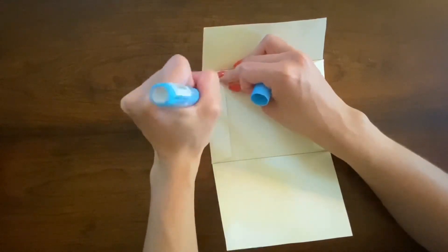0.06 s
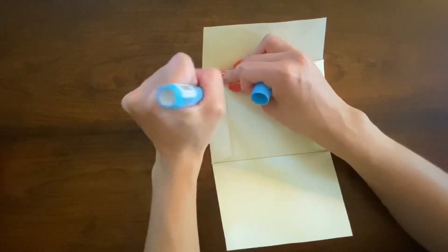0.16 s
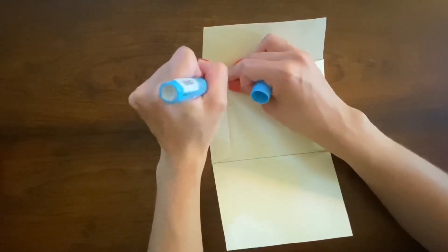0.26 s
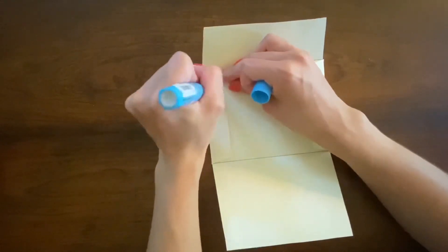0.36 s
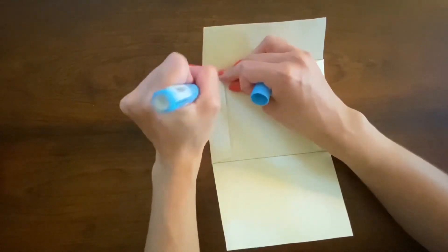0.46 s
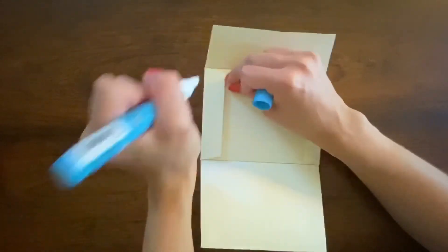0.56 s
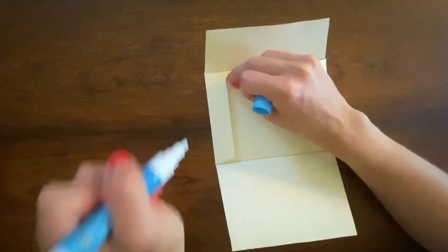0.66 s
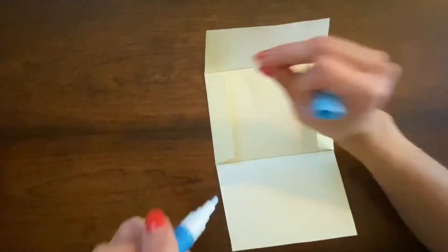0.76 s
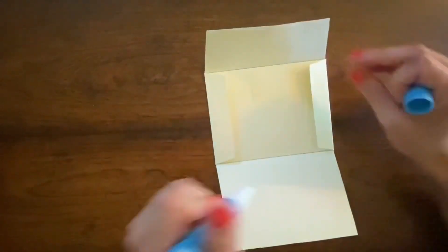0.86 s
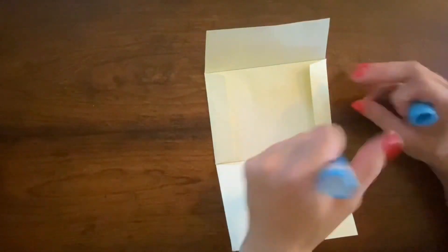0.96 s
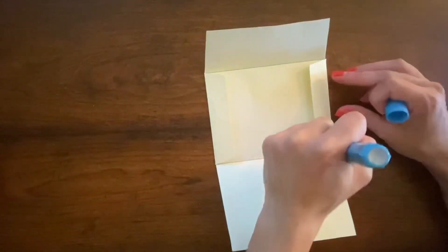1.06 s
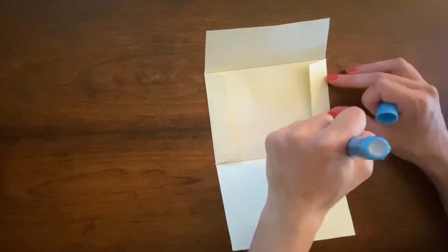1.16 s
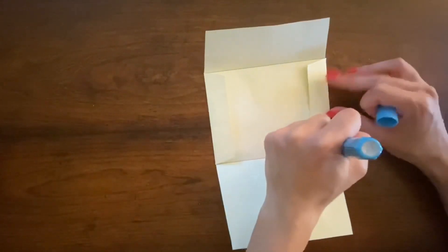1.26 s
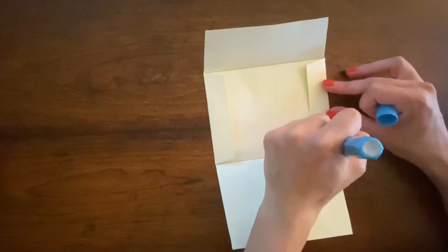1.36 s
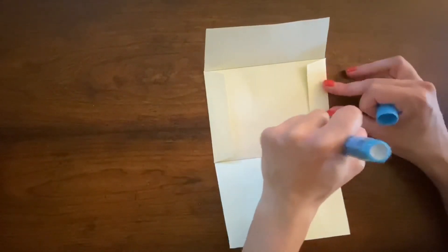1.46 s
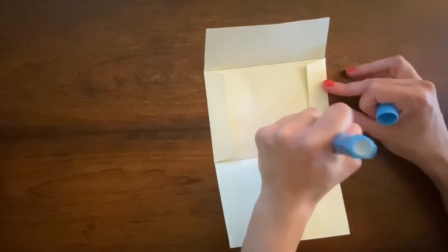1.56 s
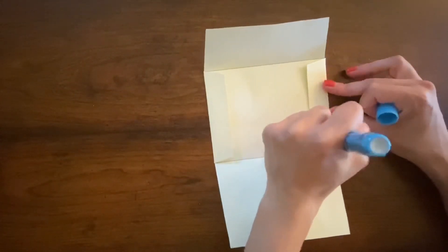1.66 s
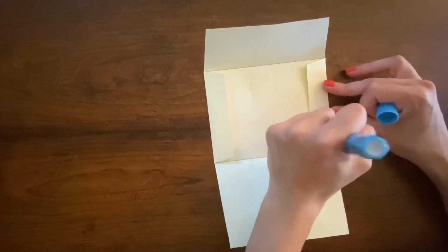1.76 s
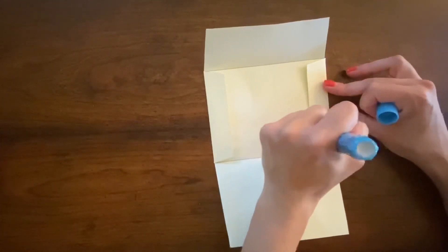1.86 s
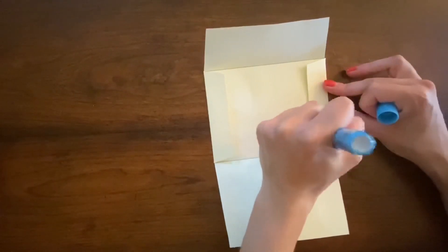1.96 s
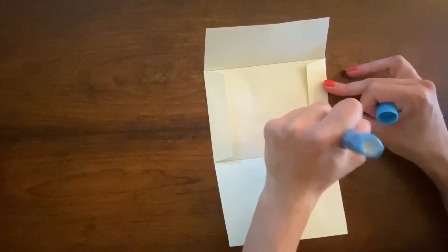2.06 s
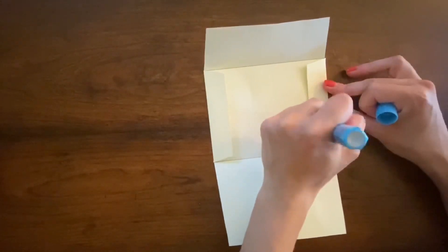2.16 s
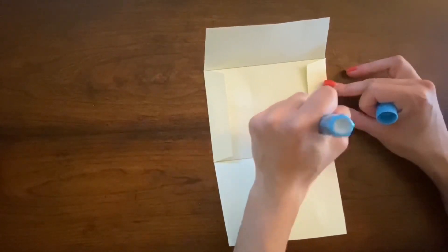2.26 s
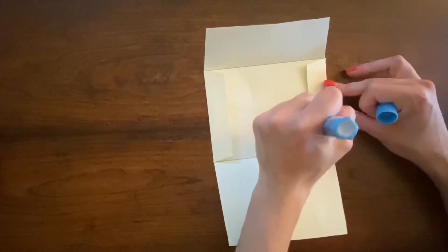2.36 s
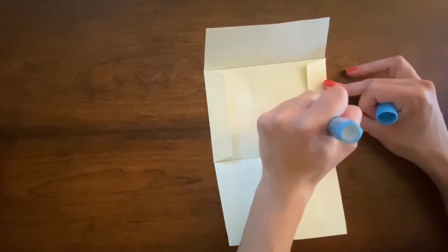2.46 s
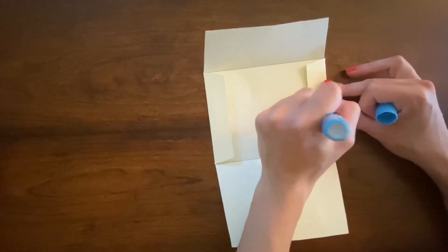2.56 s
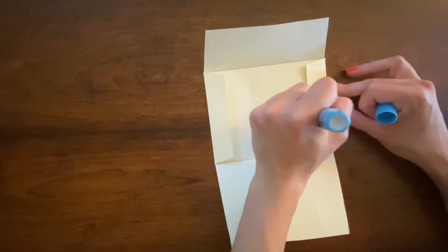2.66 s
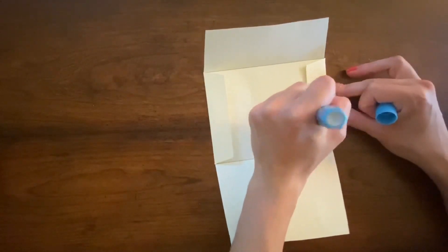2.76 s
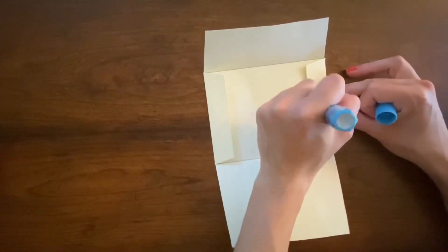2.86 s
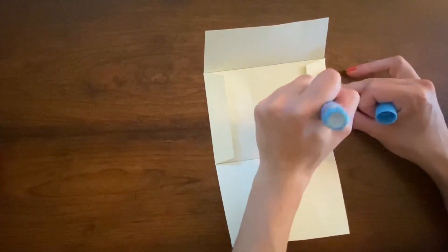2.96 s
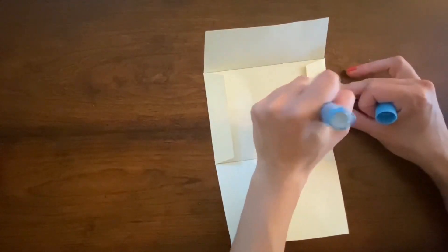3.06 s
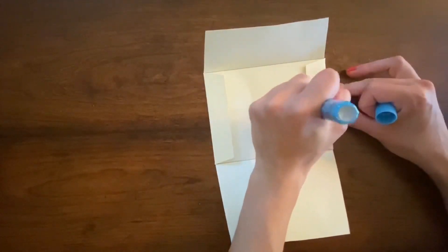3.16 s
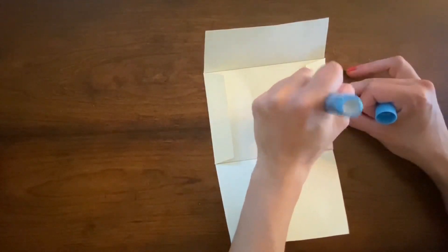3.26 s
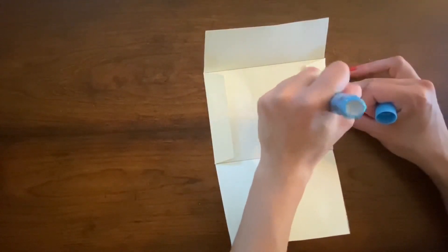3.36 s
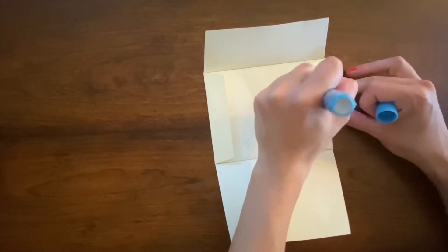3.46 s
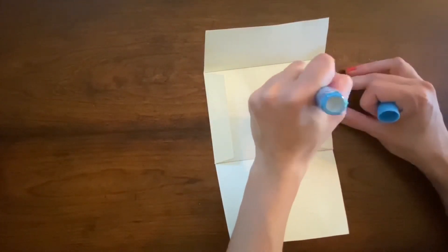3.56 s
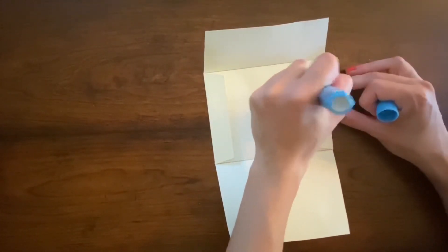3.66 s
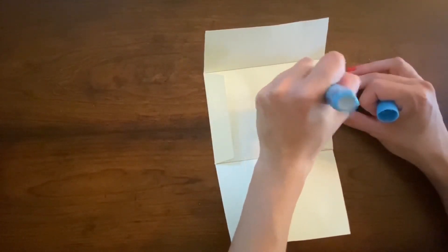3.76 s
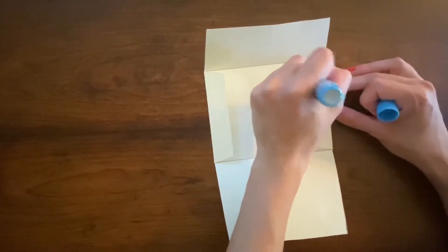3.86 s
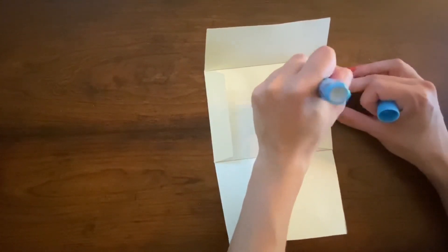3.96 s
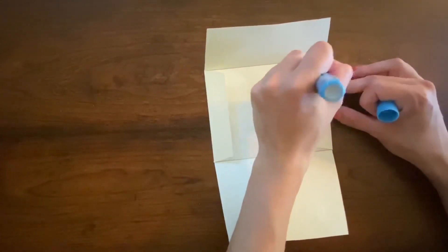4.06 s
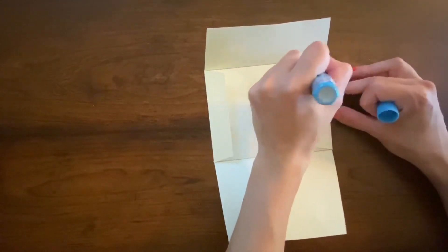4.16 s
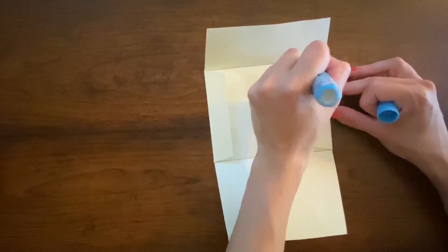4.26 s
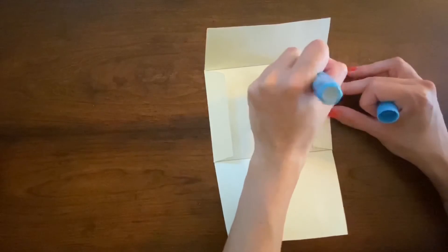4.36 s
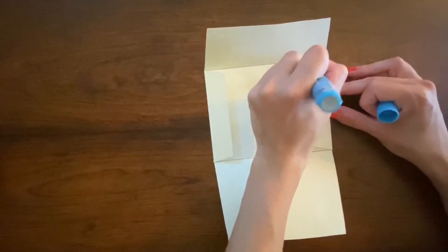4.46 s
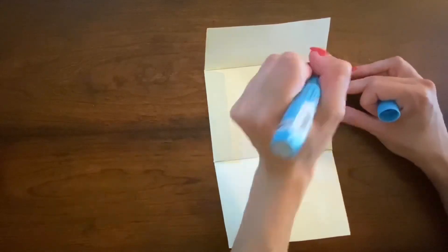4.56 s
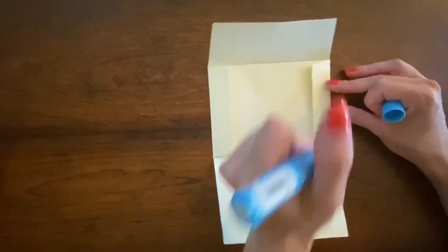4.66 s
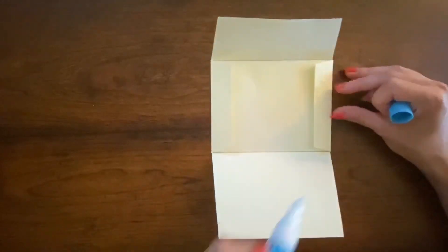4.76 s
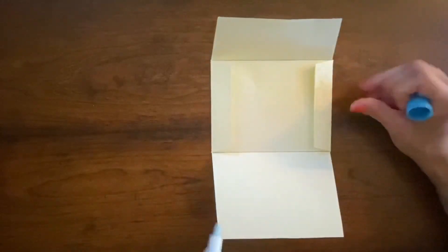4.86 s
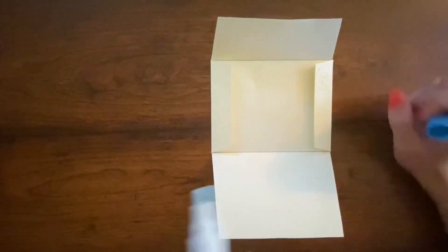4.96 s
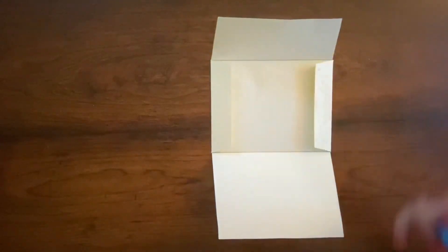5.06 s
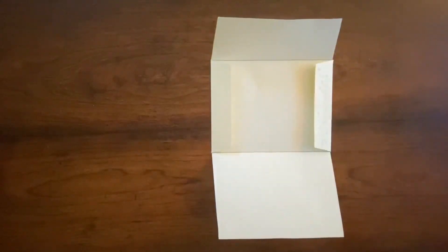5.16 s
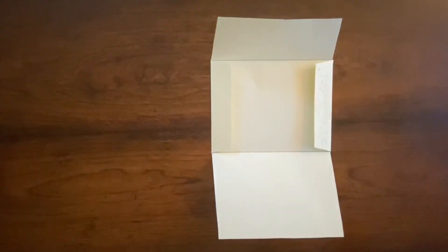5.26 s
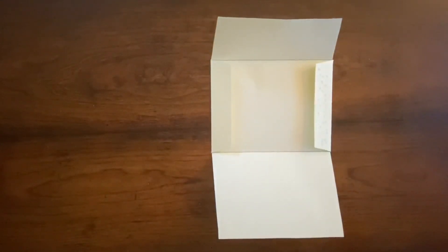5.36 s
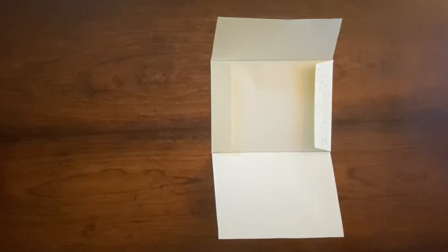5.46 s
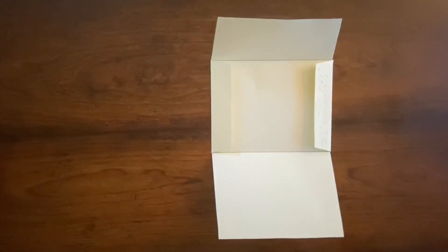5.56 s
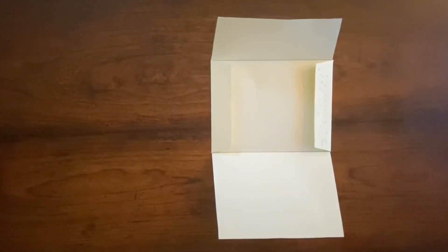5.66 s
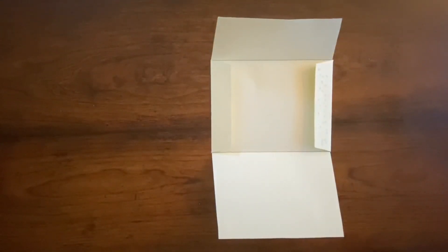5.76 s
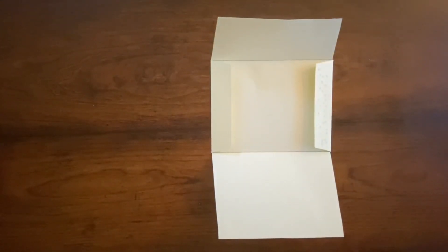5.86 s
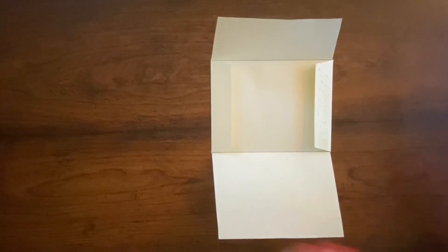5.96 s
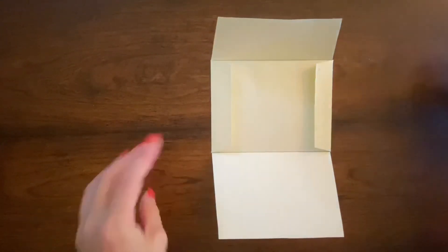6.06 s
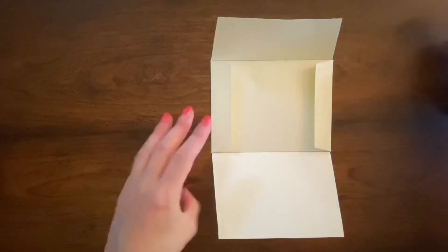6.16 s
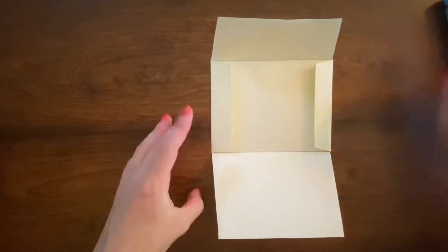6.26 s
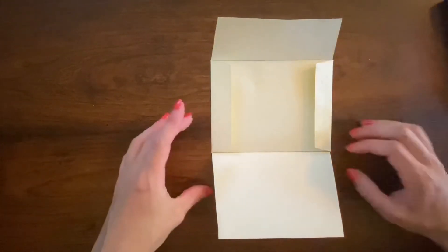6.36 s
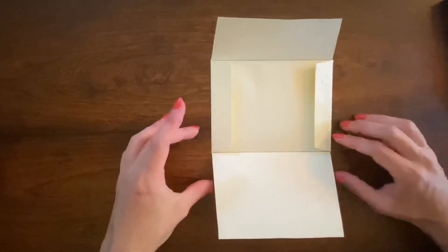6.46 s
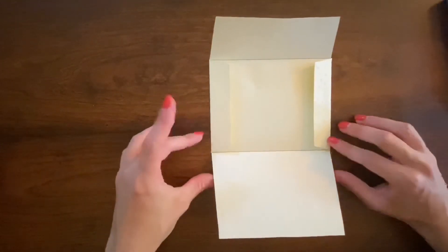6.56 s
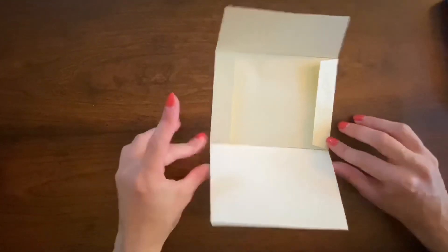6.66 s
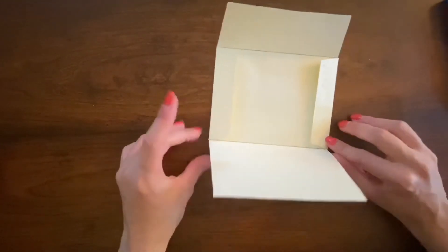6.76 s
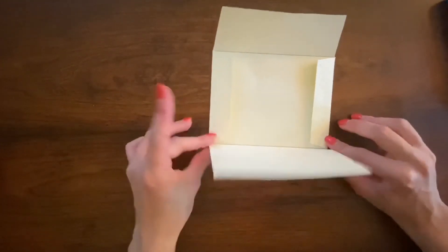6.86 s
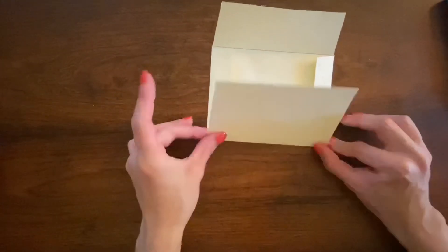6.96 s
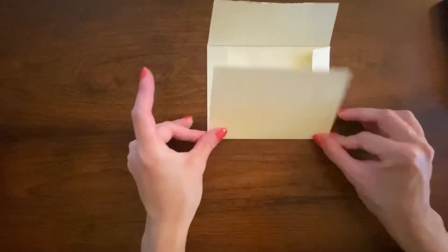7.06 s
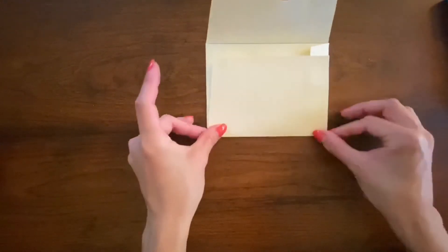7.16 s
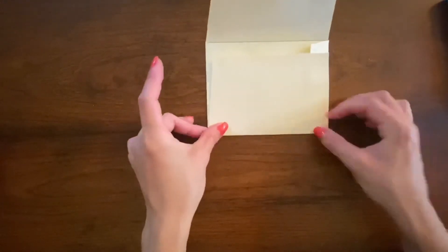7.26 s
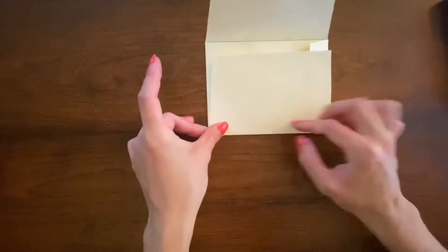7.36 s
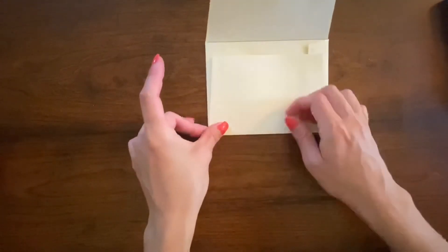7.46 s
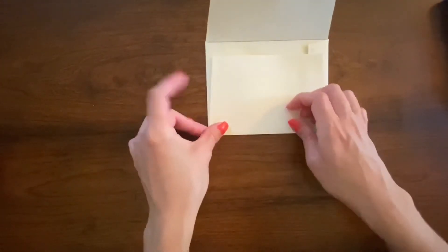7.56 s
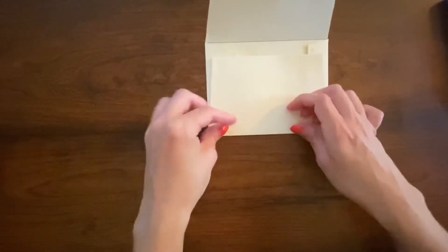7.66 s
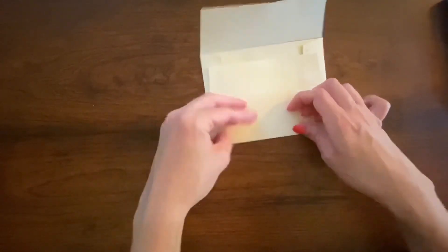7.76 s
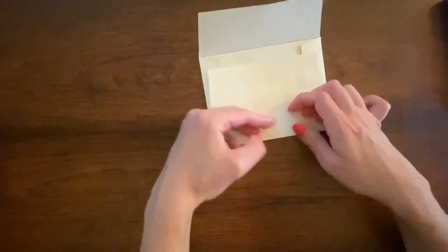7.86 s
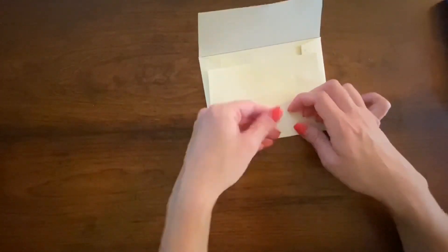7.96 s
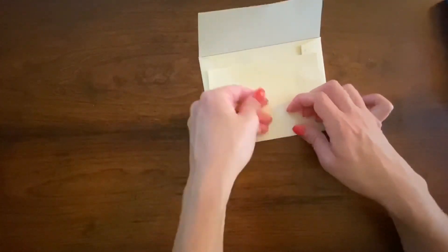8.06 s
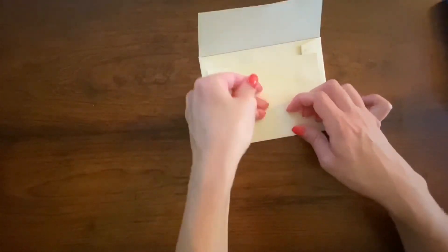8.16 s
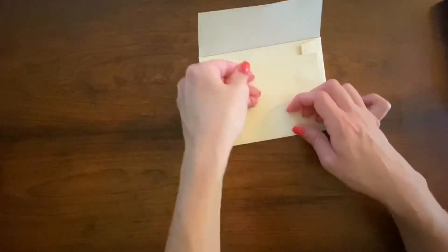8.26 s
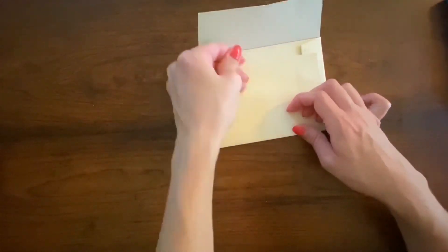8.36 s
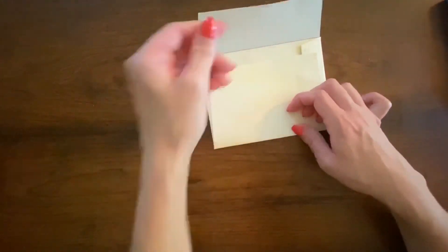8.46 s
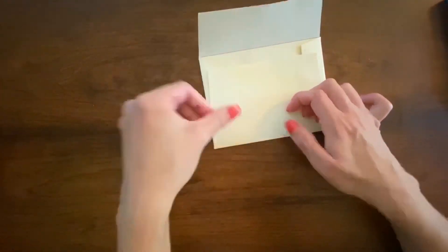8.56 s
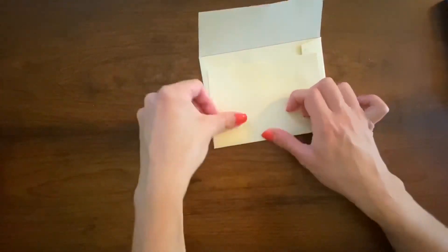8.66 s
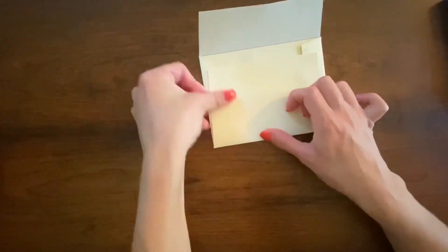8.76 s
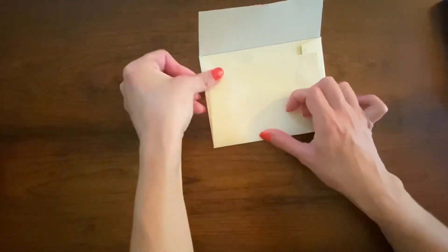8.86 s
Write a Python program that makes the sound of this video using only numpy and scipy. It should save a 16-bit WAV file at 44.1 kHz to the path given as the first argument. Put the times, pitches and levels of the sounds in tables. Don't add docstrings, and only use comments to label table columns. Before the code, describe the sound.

Close up in a quiet room, fingers shift stiff card with crisp rustles and a few table bumps. A glue pen then dabs very quickly along it, about eleven soft low thumps a second with dry scuffs. After a short lull the cap meets the barrel and snaps on, the pen clatters onto wood, and the card is folded and pressed with soft crackles.

```python
import sys
import numpy as np
from scipy import signal
from scipy.fft import rfft, irfft
from scipy.io import wavfile
from scipy.ndimage import uniform_filter1d

SR = 44100
rng = np.random.default_rng(int(sys.argv[2]) if len(sys.argv) > 2 else 0)


def unload_wav(signal):
    wavfile.write(
        sys.argv[1],
        SR,
        np.round(np.clip(np.atleast_2d(signal).T, -1, 1) * 32767).astype(np.int16),
    )


def voltage_ratio(decibels):
    exponent = np.asarray(decibels, float) / 20
    return 10 ** exponent


N = 392049
SIZE = 8192
HZ = np.fft.rfftfreq(SIZE, 1 / SR)
LONG_HZ = np.fft.rfftfreq(N, 1 / SR)

# (frequency [Hz], width [Hz], level [dB])
CARD = [(1347, 670, 12.5), (2023, 300, 6), (2650, 450, 6.5), (3650, 1570, 9.5), (5260, 1700, 17.5),
        (9050, 24000, -9.5), (14700, 2200, -35)]
# (frequency [Hz], likeness [0-1])
LIKENESS = [(60, 1), (150, 0.95), (300, 0.96), (600, 0.22), (1200, 0.49), (2200, 0.66), (3500, 0.55),
            (6000, 0.92), (15000, 0.97)]


def evened(x):
    return x / np.sqrt(np.mean(x ** 2) + 1e-20)


def read(points, hz):
    f, value = np.transpose(points)
    return np.interp(np.log(hz + 1), np.log(f + 1), value)


def modes(resonances, hz):
    return sum(voltage_ratio(db) * 1j * hz * w / (f ** 2 - hz ** 2 + 1j * hz * w) for f, w, db in resonances)


def band(hz, lo_hz, hi_hz):
    return 1 / np.sqrt((1 + (lo_hz / (hz + 1)) ** 8) * (1 + (hz / hi_hz) ** 8))


def wiggle(spread):
    once = uniform_filter1d(rng.standard_normal(len(HZ)), int(spread))
    return evened(uniform_filter1d(once, int(spread)))


def shifted(resonances, spread):
    chance = rng.standard_normal((len(resonances), 2))
    return [(f * (1 + spread * a), w, db + 50 * spread * b) for (f, w, db), (a, b) in zip(resonances, chance)]


def add(mix, s, sound):
    at = round(s * SR) - SIZE // 2
    cut = max(-at, 0)
    part = mix[at + cut:at + SIZE]
    part += sound[cut:cut + len(part)]


def peaked(spectrum, db, window=350):
    x = irfft(spectrum, SIZE)
    return voltage_ratio(db) * x / np.sqrt(uniform_filter1d(x ** 2, int(window)).max() + 1e-20)


def slips(rise_ms, fall_ms, sharp, grainy_db):
    t_ms = (np.arange(SIZE) - SIZE // 2) / SR * 1000
    shape = np.exp(-np.where(t_ms < 0, -t_ms / rise_ms, t_ms / fall_ms) ** sharp)
    grains_db = grainy_db * np.repeat(rng.standard_normal(SIZE // 32), 32)
    return rfft(shape * rng.standard_normal(SIZE) * voltage_ratio(grains_db))


def room_tone():
    # (frequency [Hz], density [dB per Hz])
    air_colour = [(150, -68), (250, -10.5), (421, -5.5), (443, -10), (827, -13.5), (871, -14), (950, -19.5),
                  (1340, -25), (15800, -52)]
    # (frequency [Hz], width [Hz], level [dB])
    hums = [(68, 39, -70.5), (807.3, 18, -77), (368, 15, -81), (225.8, 10.5, -73), (1728, 340, -87.5)]
    white = rfft(rng.standard_normal((2, N)))
    like = np.clip(read(LIKENESS, LONG_HZ) - .1, 0, 1) * band(LONG_HZ, 0, 4000)
    white[1] = like * white[0] + np.sqrt(1 - like ** 2) * white[1]
    air = white * voltage_ratio(read(air_colour, LONG_HZ)) * band(LONG_HZ, 167, 16500)
    out = voltage_ratio(-67.5) * evened(irfft(air, N))
    for f, w, db in hums:
        out += voltage_ratio(db) * evened(irfft(white * modes([(f, w, 0)], LONG_HZ) ** 2, N))
    return out


def reflections(x):
    # (frequency [Hz], time to fall 60 dB [s])
    fall_time = [(100, 0.14), (1000, 0.098), (5000, 0.17), (14000, 0.25)]
    out, turn = np.zeros((2, N)), np.arange(N) / SR * 9.0
    for k in range(3):
        hz, t, z = signal.stft(rng.standard_normal((2, SR // 2)), SR, nperseg=256)
        tail = signal.istft(z * voltage_ratio(-60 * t / read(fall_time, hz)[:, None]), SR, nperseg=256)[1]
        share = np.sqrt(2 / 3) * np.cos(np.pi * (turn + k) / 3)
        out += signal.fftconvolve(x * share, tail / np.linalg.norm(tail[0]), axes=1)[:, :N]
    return out


def hands():
    # (time [s], rustle [dB], weight of the arms [dB])
    motion = [(0.0, -76, -57), (0.49, -77, -58.5), (0.74, -81.5, -56.5), (1.34, -92, -60.5),
              (1.88, -76.5, -57.5), (4.18, -73.5, -55.5), (4.41, -83, -57), (5.54, -101, -61),
              (6.09, -70, -60), (6.359, -102, -60.5), (6.86, -71.5, -59.5), (7.52, -91, -59.5),
              (7.85, -76.5, -58), (8.89, -87.5, -59)]
    # (frequency [Hz], width [Hz], level [dB])
    legs = [(68, 12, -1.5), (98.9, 22, 0), (181, 51, -16.5)]
    s, fizz_db, rumble_db = np.transpose(motion)
    body_db = -82.5 + .5 * (fizz_db + 83.5)
    layers = [  # level, resonances, band from and to [Hz], lumpiness [dB]
        (fizz_db, CARD, 3000, 16500, 1.5),
        (body_db, CARD, 900, 3000, 1.5),
        (rumble_db, legs, 30, 250, 2.5)]
    t, out = np.arange(N) / SR, np.zeros(N)
    for db, body, lo, hi, lumpy_db in layers:
        white = rfft(rng.standard_normal(N))
        noise = evened(irfft(white * modes(body, LONG_HZ) * band(LONG_HZ, lo, hi), N))
        lumps = evened(uniform_filter1d(rng.standard_normal(N), 1500))
        out += noise * voltage_ratio(np.interp(t, s, db) + lumpy_db * lumps)
    return out


def plastic(hits, tone, rings, aside=0):
    turn_hz = [1400, 3140]
    out = np.zeros((2, N))
    colour = voltage_ratio(read(tone, HZ)) * (1 + modes(rings, HZ))
    for s, db, rise_ms, fall_ms, pan_db in hits:
        click = colour * voltage_ratio(2.0 * wiggle(spread=28)) * slips(rise_ms, fall_ms, 1.38, 2.0)
        lead = aside * np.interp(HZ, turn_hz, [0, 2 * np.pi])
        lead = lead + 0.74 * np.minimum(HZ / 5000, 1) * wiggle(spread=38)
        add(out[0], s, peaked(click * np.exp(.5j * lead), db + pan_db / 2))
        add(out[1], s, peaked(click * np.exp(-.5j * lead), db - pan_db / 2))
    return out


def cap():
    # (time [s], level [dB], rise [ms], fall [ms], left over right [dB])
    slide = [
        (5.292, -31, 19.8, 21.4, 2),
    ]
    snap = [
        (5.69, -33.5, 13.6, 11.2, 0.72),
        (5.725, -59, 30, 41, 0.63),
    ]
    # (frequency [Hz], density [dB per Hz])
    slide_tone, snap_tone = [(180, -49), (300, -24), (1040, -11), (1330, -11.5), (7000, -20), (9910, -25.5),
                             (13600, -36), (15800, -31)], [(180, -55), (300, -7.5), (1450, -6.5), (2120, -7.5),
                                                  (3550, -7.5), (4470, -9.5), (5460, -3), (15800, -21)]
    # (frequency [Hz], width [Hz], level [dB])
    slide_rings, snap_rings = [(1365, 140, 9), (1900, 360, 3.8), (2260, 220, 15)], [(3350, 690, 3), (5650, 990, 6.6), (7700, 2400, 2.9)]
    return plastic(slide, slide_tone, slide_rings, aside=1) + plastic(snap, snap_tone, snap_rings, aside=0.95)


def dropped_pen():
    # (time [s], level [dB], rise [ms], fall [ms], left over right [dB])
    clatter = [
        (6.115, -38, 14, 13, -7.5),
        (6.127, -39, 6, 7.6, -1),
        (6.135, -28, 3.9, 2.7, 2),
        (6.143, -26, 14.3, 4.2, -5.5),
        (6.162, -36, 6.6, 16, 1.5),
        (6.2, -55, 24, 50, 1.5),
    ]
    touches = [
        (6.012, -43, 13.8, 28.5, -2),
        (6.091, -42.5, 18, 36.3, -2.5),
    ]
    # (frequency [Hz], density [dB per Hz])
    barrel_tone = [(160, -41), (280, 4.5), (1560, -6.5), (1980, -15), (2640, -8.5), (3290, -15.5),
                   (8450, -21), (15800, -30.5)]
    # (frequency [Hz], width [Hz], level [dB])
    free_rings, held_rings = [(865, 140, 13.6), (1400, 170, 9.2), (2000, 210, 21), (2510, 94, 11.6),
                              (5300, 1100, 3), (8100, 760, 2.8)], [(3280, 1900, 3.5), (7740, 6100, 3.6)]
    return plastic(clatter, barrel_tone, free_rings) + plastic(touches, barrel_tone, held_rings)


def rubs():
    # (time [s], level [dB])
    landings = [(1.317, -61.5), (1.436, -56.5), (1.56, -64), (1.662, -78), (1.752, -74), (1.849, -73),
                (2.105, -69), (2.278, -62.5), (2.446, -60.5), (2.529, -65), (2.616, -65.5), (2.699, -61.5),
                (3.012, -63), (3.278, -59), (3.369, -56), (3.442, -69), (3.533, -60), (3.613, -72),
                (3.71, -60.5), (3.797, -69), (3.89, -62), (3.974, -62), (4.131, -62), (4.226, -60)]
    # (time [s], level [dB], brightness
    # [dB], length [ms])
    drags_early, drags_later = [(1.385, -58, 3.5, 38), (1.472, -56.5, 0.5, 17), (1.591, -62.5, 6, 23),
                             (1.685, -61.5, 0.5, 25), (1.782, -58.5, 3.5, 14.6), (1.869, -61.5, 4.5, 23),
                             (1.95, -53, 2.5, 19), (2.041, -54.5, 6.5, 13.7), (2.131, -56.5, 0, 14),
                             (2.193, -59.5, -3.5, 36), (2.31, -61, 5, 13.5), (2.372, -54, -9, 19),
                             (2.474, -55.5, -4.5, 23), (2.562, -61, 0, 12), (2.733, -64, 2, 21),
                             (2.805, -56, -2, 20), (2.896, -69, 7, 7)], [(2.964, -63, 1, 21), (3.051, -61.5, -2, 15),
                                                (3.134, -53.5, 1, 13.4), (3.218, -62, 1, 31),
                                                (3.312, -63.5, 6, 20), (3.401, -58.5, 1.5, 13),
                                                (3.474, -58, 0.5, 17), (3.567, -61.5, 5, 13),
                                                (3.644, -59, 6.5, 13), (3.74, -62, 7, 14),
                                                (3.825, -58.5, -5, 17), (3.913, -56.5, 6, 11),
                                                (4.008, -65.5, 11.5, 19), (4.081, -58.5, 5, 21),
                                                (4.168, -61.5, 7.5, 16), (4.263, -61, 8, 10),
                                                (4.31, -62, 2, 55), (4.381, -66.5, -6, 34)]
    # (time [s], level [dB], card body above it [dB], length [ms], flap ring [Hz])
    shifts = [(0.008, -61.5, -7, 13, 2500), (0.041, -65, 3, 8.8, 1300), (0.071, -47.5, -10, 14.4, 2730),
              (0.16, -54, -5, 10.6, 2580), (0.219, -57.5, -7, 6.4, 2760), (0.275, -54, -5, 7.4, 2550),
              (0.316, -55, -0.5, 16, 3350), (0.364, -63, 5, 23, 1130), (0.404, -56, -12, 14, 3270),
              (0.475, -52.5, 2, 37, 1900), (0.546, -51.5, 4, 23, 1700), (0.609, -60.5, -2, 40, 1900),
              (0.699, -68.5, 7, 56, 1070), (0.926, -72, 12.5, 49, 1900), (1.005, -78.5, 12, 71, 2480),
              (1.049, -81, 4, 25, 3060), (1.185, -53.5, -6.5, 17.5, 1980), (1.251, -62, -3.5, 24, 2840)]
    # (time [s], level [dB], card body above it [dB], length [ms])
    lifts = [(4.51, -77, -11, 22), (4.66, -66.5, 6.5, 140), (4.91, -72, 9, 36), (4.996, -73.5, 5, 60),
             (5.952, -76, 5, 27), (6.273, -90, 27.5, 18), (6.462, -75.5, 8, 28), (6.611, -67.5, 2, 55),
             (6.708, -72, 1, 25), (6.811, -64, -2, 19)]
    # (time [s], level [dB], card body above it [dB], length [ms], flap ring [Hz])
    presses = [(6.901, -58, 8.5, 18.4, 2190), (6.926, -57, 6.5, 21, 1500), (6.945, -61.5, 10, 22, 1400),
               (7.001, -62, 12, 18, 1700), (7.018, -63.5, 11.5, 28, 1600), (7.067, -68, 13.5, 10, 1520),
               (7.08, -63, 12, 20, 2320), (7.142, -70, 12.5, 14, 2140), (7.197, -73, 12.5, 21, 2520),
               (7.25, -67, 13.5, 20, 2220), (7.279, -67.5, 17.5, 24, 2350), (7.333, -66, 16.5, 19, 2170),
               (7.353, -65.5, 6, 45, 2500), (7.4, -72, 6, 44, 2480), (7.584, -71, 8, 14, 2780),
               (7.639, -62, 9, 25, 2650), (7.698, -58.5, 8.5, 25, 3180), (7.725, -66.5, 17.5, 18, 2740),
               (7.758, -69, 9, 13, 2800), (7.874, -61, 12, 17, 2790), (7.79, -64, 2, 42, 2810),
               (7.96, -64, -2.5, 91, 3190), (8.09, -63, -4, 30, 3050), (8.144, -64, -1, 13, 2630),
               (8.2, -63.5, 1, 93, 3500), (8.299, -59, -8, 20, 3060), (8.346, -67, -15, 19, 1120),
               (8.443, -65, 8, 23, 1060), (8.562, -64.5, 8.5, 18, 2880), (8.637, -67.5, 0, 29, 2920),
               (8.702, -65, 2, 20, 2700), (8.755, -65.5, 0, 40, 3240), (8.81, -78, -2, 17, 2880),
               (8.853, -73.5, -9, 27, 2880), (8.888, -69.5, -5, 12, 2900), (7.935, -69, 6, 9.8, 2600),
               (8.528, -90, 29.5, 7, 1120)]
    finger_air_db = {"shift": -5.5, "lift": 1.5, "press": -1.5}
    bright_db, landing_ms = -3, 12.3
    tip_body_db, tip_ring_hz = -3, 1980
    tip = [(s, db, bright_db, landing_ms) for s, db in landings] + drags_early + drags_later
    rows = [(s, db, db + tip_body_db, db + bright, ms, tip_ring_hz) for s, db, bright, ms in tip]
    for kind, moves in ("shift", shifts), ("lift", lifts), ("press", presses):
        air_db = finger_air_db[kind]
        rows += [(s, db, db + body_db, db + air_db, ms, *hz) for s, db, body_db, ms, *hz in moves]
    return rows


def paper():
    out = np.zeros(N)
    for s, fizz_db, body_db, air_db, ms, *flap_hz in rubs():
        card = modes(shifted(CARD, .025), HZ) * voltage_ratio(2.5 * wiggle(spread=70))
        rub = card * slips(0.92 * ms, 0.82 * ms, 1.57, 0.72)
        snap = card * slips(0.87 * ms, 0.85 * ms, 1.57, 2.7)
        body = snap * (1 + modes([(f, 750, 10.5) for f in flap_hz], HZ))
        fizz = peaked(rub * band(HZ, 3100, 7500), fizz_db - 3.5)
        low = peaked(body * band(HZ, 950, 3500), body_db - 3.5)
        air = peaked(rub * band(HZ, 7500, 16500), air_db - 3.0)
        add(out, s, fizz + low + air)
    return out


def blows():
    # (time [s], ring [dB], low push [dB], knock [dB])
    dabs_early, dabs_later = [(1.364, -38, -39, -49), (1.442, -37, -38.5, -45), (1.571, -37.5, -45, -51.5),
                           (1.668, -41, -44, -57.5), (1.762, -40, -40.5, -52), (1.856, -36, -44.5, -51.5),
                           (1.935, -36, -36, -43), (2.019, -44.5, -35.5, -67), (2.112, -45, -40, -64.5),
                           (2.197, -36, -43, -49.5), (2.283, -37.5, -47, -51.5), (2.369, -39, -39, -42.5),
                           (2.455, -44.5, -41.5, -55), (2.535, -45, -37.5, -54), (2.618, -46, -37.5, -65),
                           (2.706, -38, -42.5, -56.5), (2.786, -50.5, -40.5, -50.5), (2.863, -64, -47, -65)], [(2.948, -49, -37.5, -65), (3.026, -40, -39, -55),
                                             (3.113, -42, -41, -57), (3.2, -43.5, -37.5, -53.5),
                                             (3.285, -36.5, -40, -55), (3.382, -43.5, -36, -51.5),
                                             (3.452, -52, -37, -55), (3.534, -49, -36.5, -59.5),
                                             (3.625, -49, -37.5, -58), (3.723, -40, -35.5, -44),
                                             (3.803, -65, -34, -53.5), (3.896, -41, -38.5, -49),
                                             (3.976, -46, -36, -58), (4.06, -52, -40.5, -55.5),
                                             (4.14, -47, -37.5, -59), (4.235, -40, -38.5, -49),
                                             (4.312, -38, -41, -44), (4.396, -51.5, -42.5, -78)]
    # (time [s], ring [dB], low push [dB], knock [dB])
    bumps = [(0.051, -39.5, -45.5, -53), (0.287, -67, -46.5, -59), (0.368, -39, -38, -47),
             (0.929, -79, -54, -49), (1.261, -58, -56, -66), (4.886, -40.5, -58, -50),
             (4.925, -53.5, -48.5, -55), (6.932, -57.5, -78, -52.5), (8.572, -57, -44.5, -58),
             (8.631, -79, -47.5, -81)]
    # (time [s], ring [dB], low push [dB], knock [dB])
    drops = [
        (5.69, -56, -53, -53.5),
        (6.02, -40, -62.5, -41),
        (6.1, -40.5, -54, -39),
        (6.144, -37.5, -35.5, -36),
        (6.209, -47, -46.5, -54),
    ]
    tick_db = {"dab": -60, "bump": -66.5, "drop": -66.5}
    groups = ("dab", dabs_early + dabs_later), ("bump", bumps), ("drop", drops)
    return [(*row, tick_db[kind] + 0.64 * (row[-1] + 55)) for kind, rows in groups for row in rows]


def table_top():
    # (frequency [Hz], width [Hz], level [dB])
    top_modes = [(45, 23, -13), (92, 20, 1), (131, 24, 0), (213.5, 18, 4.5), (290.2, 25, -9.5),
                 (407, 71, -15)]
    # (frequency [Hz], width [Hz], level [dB])
    bending_modes = [(414, 99, -13.5), (517, 140, -0.5), (594, 56, 3), (740, 220, -3)]
    contact_ms, damped_db, damped_ms = 14, 9, 50
    spot_spread = 0.036
    out, tip = np.zeros(N), modes(CARD, HZ)
    after_ms = np.maximum(np.arange(SIZE) - SIZE // 2, 0) / SR * 1000
    for s, ring_db, push_db, knock_db, tick_db in blows():
        ring = modes(shifted(top_modes, spot_spread), HZ)
        board = modes(shifted(bending_modes, spot_spread), HZ)
        late_s = -.003 * np.log2((HZ + 20) / 220) + .0004 * contact_ms * wiggle(spread=3)
        delay = np.exp(-2j * np.pi * np.cumsum(late_s) * HZ[1])
        z = ring * voltage_ratio(2.2 * wiggle(spread=4.2)) * delay
        blow = peaked(z * band(HZ, 117.4, 385), ring_db)
        loudest = uniform_filter1d(blow ** 2, 350, mode="wrap").argmax()
        push = peaked(z * band(HZ, 40, 197), push_db, window=280)
        blow = np.roll(blow + push, SIZE // 2 - loudest)
        blow = blow * voltage_ratio(-damped_db * np.tanh((after_ms / damped_ms) ** 2))
        touch = slips(5.1, 23.0, 0.93, 3.9) * voltage_ratio(2.0 * wiggle(spread=40))
        tick = peaked(touch * tip * band(HZ, 670, 1940), tick_db + 0.5)
        knock = peaked(slips(9.4, 21.8, 1.03, 1.1) * board * band(HZ, 350, 725), knock_db - 4.5)
        add(out, s, blow)
        add(out, s - .009, knock + tick)
    return out


def scene():
    # (frequency [Hz], lead of the left [rad])
    rocking = [(50, -0.0052), (78, -0.55), (102, -.05), (130, .05), (170, 0.12)]
    near = (table_top() + paper() + hands()) * voltage_ratio(np.array([[-.2], [.2]]))
    near = near + cap() + dropped_pen()
    like = np.clip(read(LIKENESS, LONG_HZ), 0, 1)
    mixed = np.sqrt(like) * rfft(near) + np.sqrt(1 - like) * rfft(reflections(near))
    sway = .5j * read(rocking, LONG_HZ)
    return irfft(mixed * np.exp([sway, -sway]), N) + room_tone()


def roll_off(x):
    return signal.sosfilt(signal.butter(12, 15820, fs=SR, output="sos"), x)


def record(dry):
    # (frequency [Hz], lead of the left [rad])
    port_lead = [(400, 0), (520, -.6), (950, .8), (1720, .3), (5400, 1.0), (6800, 2.7), (7900, 3.6),
                 (9700, 6.28), (11600, 6.8), (12600, 9.0), (14400, 9.9), (15500, 12.4)]
    hz, t, z = signal.stft(dry, SR, nperseg=512, noverlap=384)
    wander = evened(uniform_filter1d(rng.standard_normal(len(t)), 40))
    lead = np.interp(hz, *np.transpose(port_lead))[:, None] + .18 * (hz / 7000)[:, None] * wander
    turned = z * np.exp(.5j * np.array([lead, -lead]))
    ported = signal.istft(turned, SR, nperseg=512, noverlap=384)[1]
    return roll_off(ported[:, :N])


dry = scene()
out = record(dry)
unload_wav(out)
```